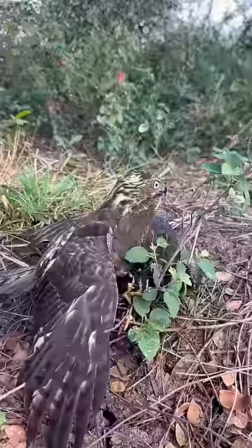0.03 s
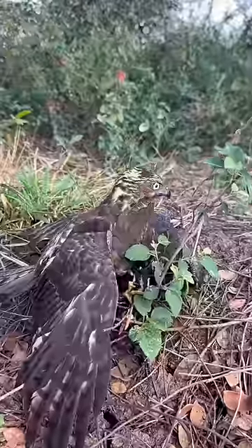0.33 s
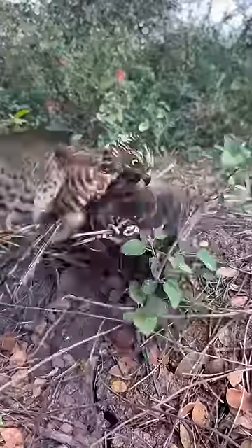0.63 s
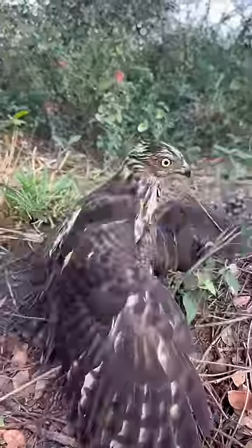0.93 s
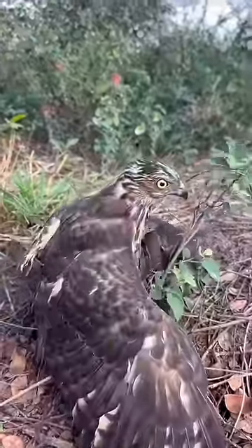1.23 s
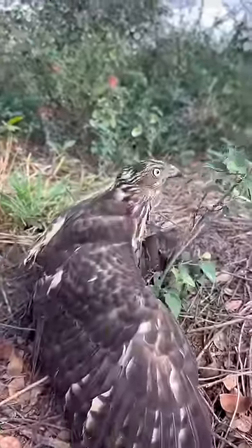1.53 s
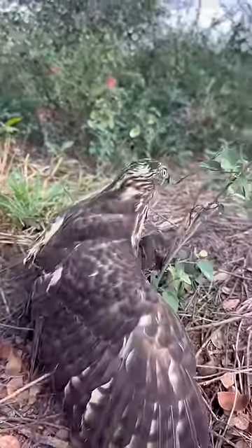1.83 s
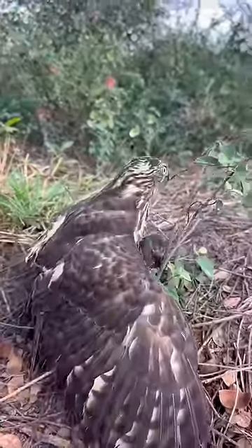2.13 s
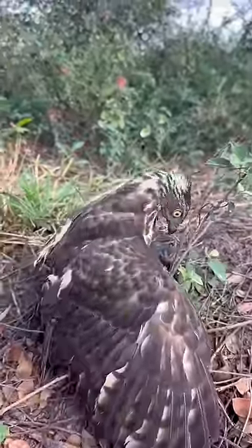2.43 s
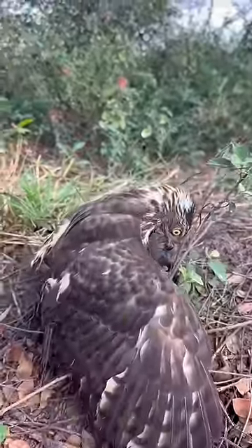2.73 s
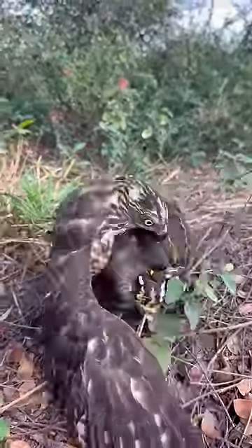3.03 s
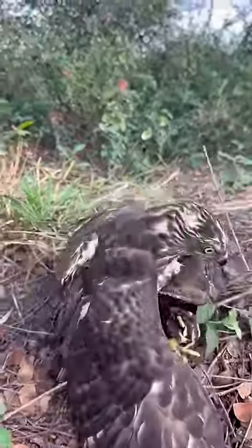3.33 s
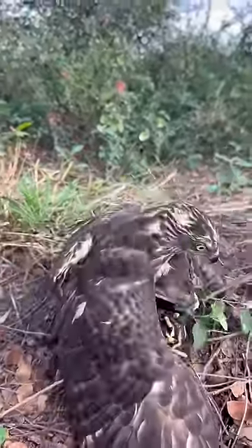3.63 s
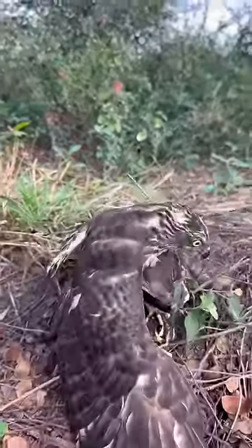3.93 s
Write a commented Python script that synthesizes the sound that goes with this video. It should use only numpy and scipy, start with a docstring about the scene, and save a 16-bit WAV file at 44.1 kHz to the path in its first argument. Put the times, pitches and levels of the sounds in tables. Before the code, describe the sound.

Close, uneven rustling of feathers and dry leaves, with small twig snaps, comes from a bird of prey on the ground. It eases off and briefly returns. Behind it are a quiet outdoor hush and a distant engine's low chugging.

```python
"""A quiet field. Close by, a hawk shuffles wings and feet in dry leaves: feathers brush, leaves crackle,
twigs snap. Far off a slow engine, probably a one-cylinder pump, thumps once per firing over its echoes.
A faint drone swells twice, a few dull bumps sound and a small bird peeps once.
A splice at 2.3 s briefly drops the hush and brings the next thumps 40 ms early.
Near the end everything starts over."""
import sys
import numpy as np
from scipy import signal
from scipy.fft import rfft, irfft
from scipy.io import wavfile
from scipy.ndimage import uniform_filter1d

SR = 44100
rng = np.random.default_rng(int(sys.argv[2]) if len(sys.argv) > 2 else 0)


def log_audio(samples):
    """Write samples as a 16-bit WAV file to the path given in sys.argv[1]."""
    # one column per channel
    frames = np.atleast_2d(samples).T
    # limit to full scale, then quantise
    limited = np.clip(frames, -1, 1)
    pcm = np.round(limited * 32767).astype(np.int16)
    wavfile.write(sys.argv[1], SR, pcm)


N = 176400


def undb(db):
    """Decibels to gain."""
    return 10 ** (np.asarray(db) / 20)


def unit(x):
    """Scale to rms 1."""
    return x / np.sqrt(np.mean(x ** 2) + 1e-30)


def over_hz(points):
    """Table read at every FFT bin, on a log frequency axis."""
    hz, value = np.array(points).T
    return np.interp(np.log(np.arange(N // 2 + 1) * SR / N + 1), np.log(hz), value)


def colour(x, spectrum):
    """Shape the spectrum; result at rms 1."""
    return unit(irfft(rfft(x) * undb(over_hz(spectrum)), N))


def band(x, hz, octaves):
    """Resonant band-pass."""
    edges_hz = [min(hz * 2 ** (-octaves / 2), SR * .4), min(hz * 2 ** (octaves / 2), SR * .48)]
    return signal.sosfilt(signal.butter(2, edges_hz, "band", fs=SR, output="sos"), x)


def walk(per_s):
    """Smooth random wander, spread near 1."""
    return np.interp(np.arange(N) / SR * per_s, np.arange(N // 100), rng.standard_normal(N // 100))


def swell(t, peak_s, width_s):
    """Gaussian envelope, 1/e at width_s from the peak."""
    return np.exp(-((t - peak_s) / width_s) ** 2)


def crackle(per_s, spread_db=3.5, brush_db=-3.5, leaf_db=4, flutter_db=1.45):
    """Tiny leaf fractures over brushing noise; each leaf lends its colour for a few milliseconds."""
    clicks = (rng.random(N) < per_s / SR) * rng.choice([-1, 1], N)
    clicks = clicks * undb(spread_db * np.minimum(rng.exponential(size=N), 4))
    brush = undb(brush_db) * rng.standard_normal(N)
    cells = signal.stft(unit(clicks) + brush, nperseg=256)[2]
    patches = uniform_filter1d(rng.standard_normal(cells.shape), size=4, axis=0)
    patches = unit(uniform_filter1d(patches, size=3, axis=1)).clip(-2, 2)
    leaves = signal.istft(cells * undb(leaf_db * patches), nperseg=256)[1][:N]
    return leaves * undb(flutter_db * walk(per_s=130))


def field_hush(t, stir_db=2.8):
    """Faint open-air hush of stirring leaves; the level dips briefly at the splice."""
    # Each row: frequency in Hz, relative level in dB.
    spectrum = [(40,0),(150,9),(350,-1.5),(600,-3),(1000,-11),(1700,-13.5),(2900,-9),(4000,-17),(8000,-25.5),(11000,-53)]
    # Each row: time in seconds, level in dB.
    levels = [(0,-60.5),(2.1,-71),(2.297,-69.5),(2.306,-92),(2.335,-69.5),(2.71,-73),(3.3,-80)]
    leaves = np.array([colour(crackle(per_s=1400), spectrum) for _ in range(2)])
    return leaves * undb(np.interp(t, *np.array(levels).T) + stir_db * walk(per_s=24))


def rustle(t, crisp_gain_db=9.5, litter_gain_db=3):
    """Wings sweep the crisp top leaves and feet press the litter below, in uneven bursts."""
    # Each row: time in seconds, crisp level in dB, litter level in dB, both before their gains.
    levels = [(.04,-65.5,-62),(.2,-77,-76.5),(.26,-72.5,-72),(.35,-77,-73.5),(.41,-53,-55.5),(.48,-57,-55),(.55,-61,-61),(.6,-56,-55),(.642,-44.5,-49),
              (.675,-49,-51),(.705,-55,-61),(.745,-54.5,-60),(.83,-63.5,-65),(.89,-56,-56),(.96,-55,-61.5),(1.01,-63,-58),(1.07,-59.5,-61),(1.28,-73,-67),
              (1.335,-78.5,-72),(1.425,-61.5,-69.5),(1.49,-60.5,-63.5),(1.58,-79.5,-73),(1.68,-67,-65),(1.85,-88.5,-73),(1.9,-58,-65.5),(1.96,-72,-68.5),
              (2.03,-63,-66),(2.09,-65.5,-66),(2.15,-88,-71.5),(2.3,-106,-84.5),(2.7,-105,-81),(2.84,-84,-75.5),(2.925,-60.5,-63.5),(2.98,-62,-69),(3.02,-53,-52),
              (3.13,-59.5,-65.5),(3.22,-64,-69),(3.27,-59.5,-55),(3.34,-70,-67)]
    # Top leaves and feathers. Each row: frequency in Hz, relative level in dB.
    crisp_spectrum = [(500,-32),(1500,-4.5),(2800,-0.5),(4800,-4.5),(6500,1),(8500,-1),(11000,2.5),(15500,3)]
    # Pressed litter. Each row: frequency in Hz, relative level in dB.
    litter_spectrum = [(50,-55),(150,7.5),(250,-4),(500,1),(800,0.5),(1200,-2),(2000,-8),(3500,-8),(15000,-28)]
    at_s, crisp_db, litter_db = np.array(levels).T
    crisp = colour(crackle(per_s=3000), crisp_spectrum)
    crisp *= undb(np.interp(t, at_s, crisp_db) + crisp_gain_db)
    litter = colour(crackle(per_s=1300), litter_spectrum)
    litter *= undb(np.interp(t, at_s, litter_db) + litter_gain_db)
    return crisp + litter


def snap(start_s, db, hz, octaves, decay_s, crack, size=4096):
    """Impulse of height crack plus a splintering tail; db is the rms with all energy put in 5 ms."""
    splinters = rng.standard_normal(size) * np.exp(-np.arange(size) / SR / decay_s)
    burst = unit(splinters) / np.sqrt(size)
    burst[0] += crack
    sound = undb(db) * unit(band(burst, hz, octaves)) * np.sqrt(.005 * SR / size)
    return np.pad(sound, (int(start_s * SR), N))[:N]


def twigs(crack, decay_cycles=2.9):
    """Thick twigs snap lower and splinter longer than thin ones; one dry stalk scrapes in the pause."""
    # Each row: start in seconds, level in dB, centre in Hz, width in octaves.
    breaks = [(.0665,-57.5,2120,0.93),(0.2299,-54,2580,0.83),(0.2358,-55.5,2500,0.76),(0.2384,-61,2550,.55),(0.3841,-53.5,1266,0.43),
              (0.4015,-27.5,14800,0.41),(0.46,-43.5,4770,1.7),(0.4727,-47.5,1670,2.4),(0.6718,-42.5,3430,1.1),
              (.8492,-49.5,2500,2.9),(.865,-50,6000,2.2),(0.8913,-41.5,6500,4.1),(1.005,-54,1900,0.52),(1.1118,-56.5,4000,3.2),(1.485,-59,796,2.4),
              (1.657,-60,1400,1.9),(1.733,-56.5,1290,2.5),(1.9127,-56.5,1490,.9),(2.0842,-51.5,1280,1.36),(2.112,-55,6900,2.3),
              (2.453,-67,840,3.1),(2.632,-75,2650,0.47),(2.862,-65,3140,1.3),(3.061,-50.5,1800,2.7),(3.2528,-48.5,2420,1.04),(3.28,-55,940,0.92)]
    snaps = sum(snap(at_s, db, hz, octaves, decay_cycles / hz, crack) for at_s, db, hz, octaves in breaks)
    scrape = snap(start_s=2.36, db=-60, hz=5100, octaves=0.58, decay_s=0.009, crack=0)
    return snaps + scrape


def diffuse_rustle(t, side_db=-0.5):
    """Rustle and splintering from all around, nearly unrelated left and right."""
    mid = rustle(t) + twigs(crack=0)
    side = rustle(t) + twigs(crack=0)
    return (mid + np.array([[-1], [1]]) * undb(side_db) * side) / np.hypot(1, undb(side_db))


def hawk(t):
    """Rustle and snaps from ahead reach two microphone ports out of step, mixed with diffuse sound."""
    # Each row: frequency in Hz, lead of the right port in radians.
    port_phase = [(4800,0),(6000,.7),(8000,1.8),(9600,2.3),(10800,3.1),(13400,3.2),(14500,3.8),(15600,4.4)]
    # Share of diffuse sound; a notch near 11 kHz leaves left and right almost purely opposite in phase.
    # Each row: frequency in Hz, relative level in dB.
    diffuse_share = [(150,-28),(400,12.5),(1100,6),(1800,-11),(2800,5),(3700,0),(5200,-0.5),(9000,-6.5),(10200,-7.5),(11000,-28.5),(13200,-12.5),(14200,-7)]
    ahead = rustle(t) + twigs(crack=1.13)
    direct = rfft(ahead) * np.exp(.5j * np.array([[-1], [1]]) * over_hz(port_phase))
    share = undb(over_hz(diffuse_share))
    diffuse = share * rfft(diffuse_rustle(t))
    return irfft((direct + diffuse) / np.hypot(1, share), N)


def far_drone(t):
    """Faint narrow band of noise that swells and fades twice."""
    # Each row: peak time in seconds, level in dB.
    peaks = [(.08,-70),(2.101,-69)]
    envelope = sum(undb(db) * swell(t, at_s, width_s=0.21) for at_s, db in peaks)
    return envelope * unit(band(rng.standard_normal((2, N)), hz=566, octaves=0.25))


def engine(t, firing_hz=7.25, first_s=.088, splice_at_s=2.302, splice_shift_s=.04):
    """One dull thump per firing; the land returns the same echoes each time and blurs them to a rumble."""
    # Echoes and rumble. Each row: frequency in Hz, relative level in dB.
    spectrum = [(22,-43),(32,-17),(50,0),(70,4),(100,-2),(140,-5.5),(175,-14.5),(240,-39),(400,-71.5)]
    # Fading and returning on the air. Each row: time in seconds, gain in dB.
    carry = [(0,-2),(.5,0.5),(.85,-1),(1.25,.5),(1.8,-4),(2.13,3),(2.35,-1),(2.6,-0.5),(3.3,0)]
    thump_hz, jitter_db, echo_decay_s = 72.4, 1.2, 0.1
    thump_db, echo_db, rumble_db = -40.5, -57, -53.5  # before pan and carry
    firings_s = first_s + np.arange(N * 8 // SR) / firing_hz
    firings_s -= splice_shift_s * (firings_s > splice_at_s)
    strengths = undb(jitter_db * rng.standard_normal(len(firings_s)))
    thumps = sum(strength * np.cos(2 * np.pi * thump_hz * (t - at_s)) * swell(t, at_s, width_s=0.012)
                 for at_s, strength in zip(firings_s, strengths))
    pulses = np.bincount((firings_s * SR).astype(int), strengths, N)[:N]
    land_response = rng.standard_normal(N) * np.exp(-t / echo_decay_s)
    echoes = colour(irfft(rfft(pulses) * rfft(land_response), N), spectrum)
    rumble = colour(rng.standard_normal(N) + 0.18 * rng.standard_normal((2, N)), spectrum)
    sound = undb(thump_db) * thumps + undb(echo_db) * echoes + undb(rumble_db) * rumble
    pan = undb([[.5], [-.5]])
    return sound * pan * undb(np.interp(t, *np.array(carry).T))


def bumps(t):
    """Short dull bumps at the microphone push its two ports in opposite directions."""
    # Each row: peak time in seconds, level in dB.
    peaks = [(0.478,-31.5),(1.873,-50),(1.91,-51),(1.932,-50),(2.454,-55)]
    envelope = sum(undb(db) * swell(t, at_s, width_s=0.004) for at_s, db in peaks)
    return envelope * unit(band(rng.standard_normal(N), hz=463, octaves=1.1)) * np.array([[1], [-1]])


def bird_peep(t, hz=2990, level_db=-72.3):
    """One short, slightly wavering tone from a small distant bird."""
    pitch_hz = hz * (1 + 0.022 * walk(per_s=300))
    tone = np.sin(2 * np.pi * np.cumsum(pitch_hz) / SR)
    return undb(level_db) * swell(t, peak_s=2.26, width_s=.022) * tone


def scene():
    """Hawk in front, engine and field behind."""
    t = np.arange(N) / SR
    return hawk(t) + bumps(t) + engine(t) + field_hush(t) + far_drone(t) + bird_peep(t)


def record(dry, start_s=.035, loop_s=3.32, top_hz=15900):
    """The sound cuts in at start_s and starts over after loop_s; steep low-pass at top_hz."""
    start = int(start_s * SR)
    elapsed = np.arange(N) - start
    looped = dry[:, start + elapsed % int(loop_s * SR)] * (elapsed >= 0)
    return signal.sosfilt(signal.ellip(10, .2, 80, top_hz, fs=SR, output="sos"), looped)


dry = scene()
out = record(dry)
log_audio(out)
```